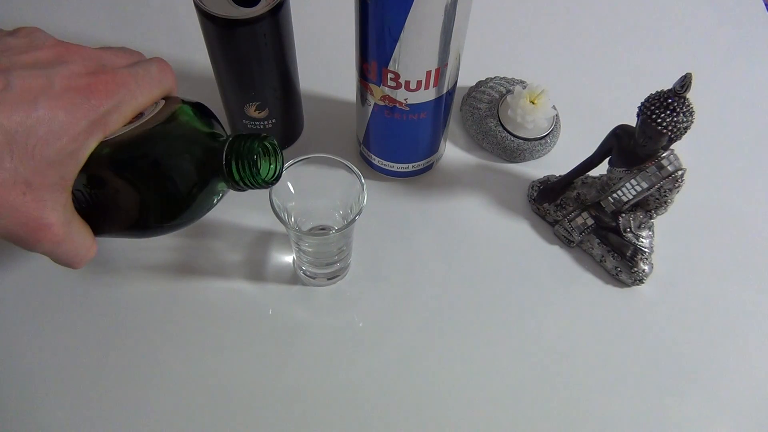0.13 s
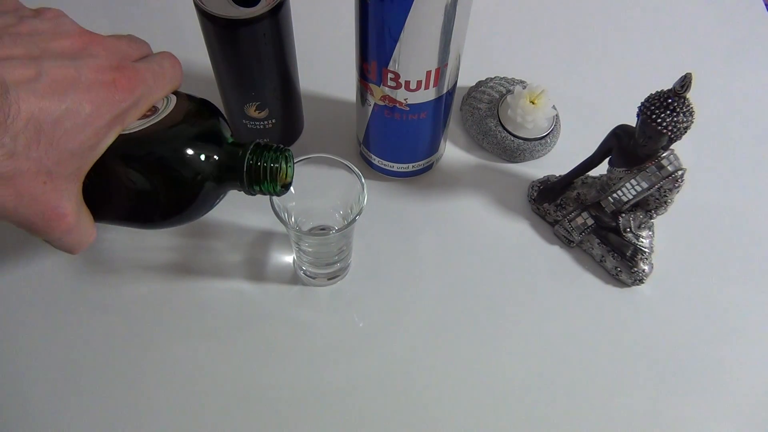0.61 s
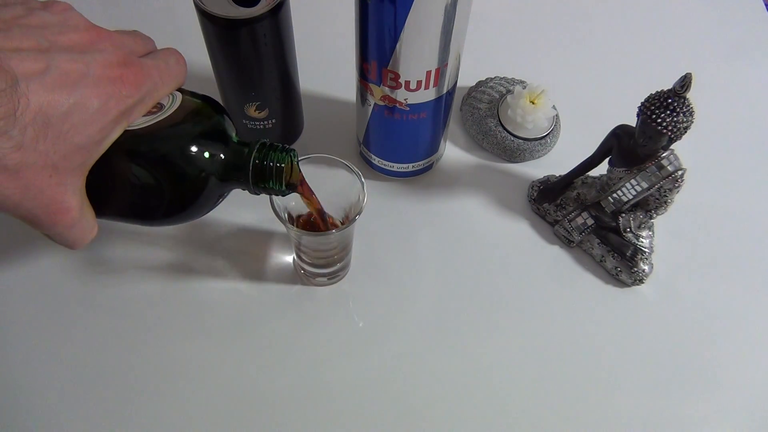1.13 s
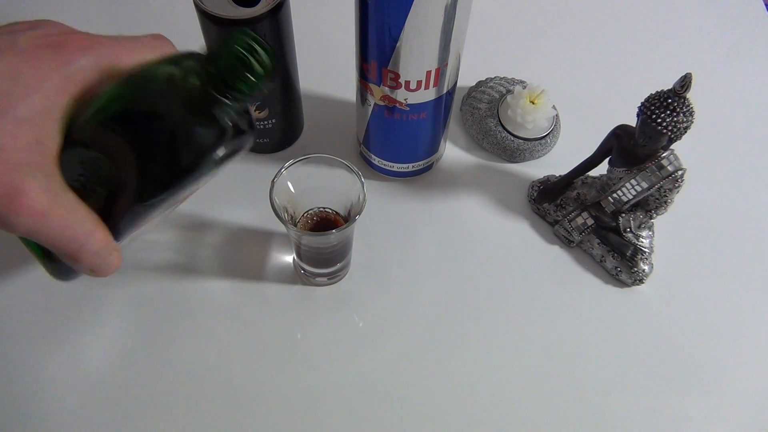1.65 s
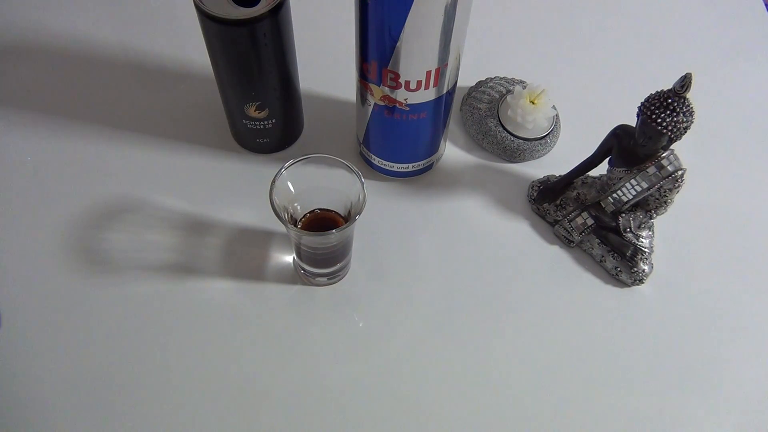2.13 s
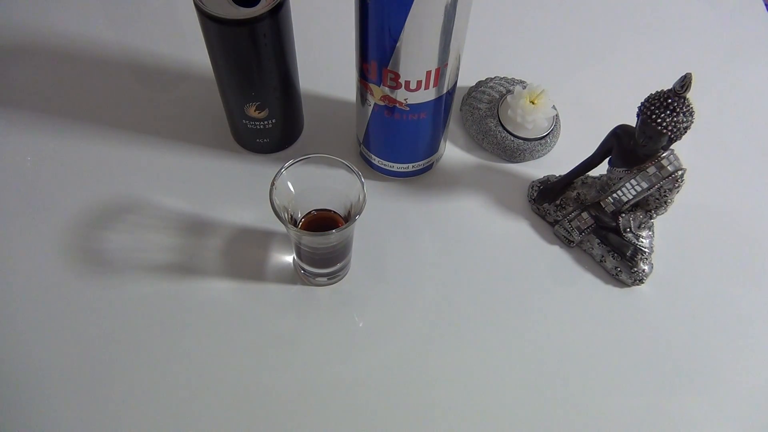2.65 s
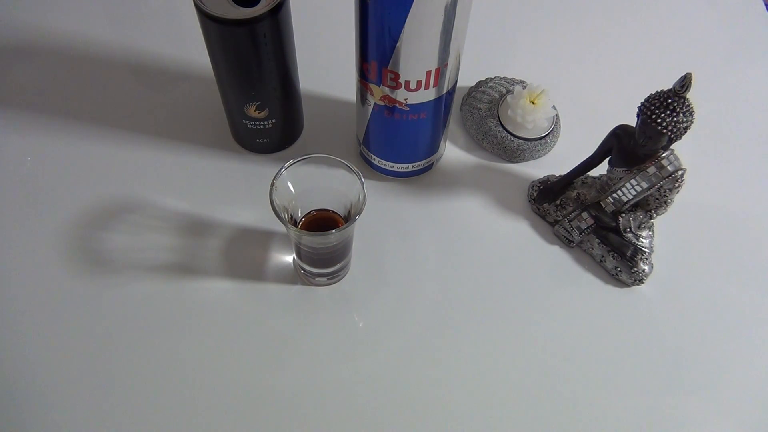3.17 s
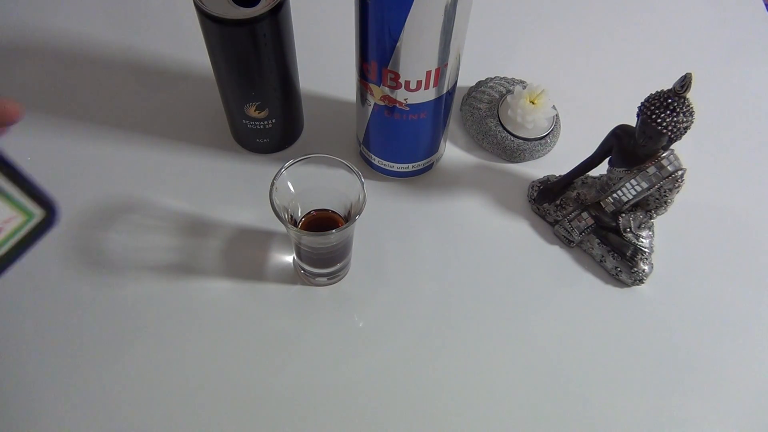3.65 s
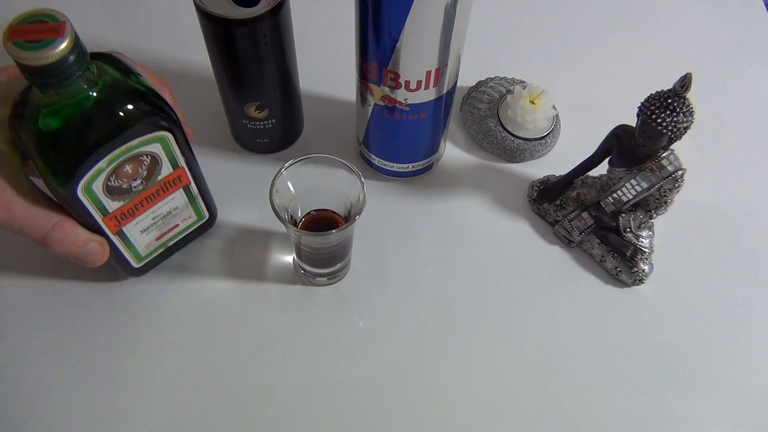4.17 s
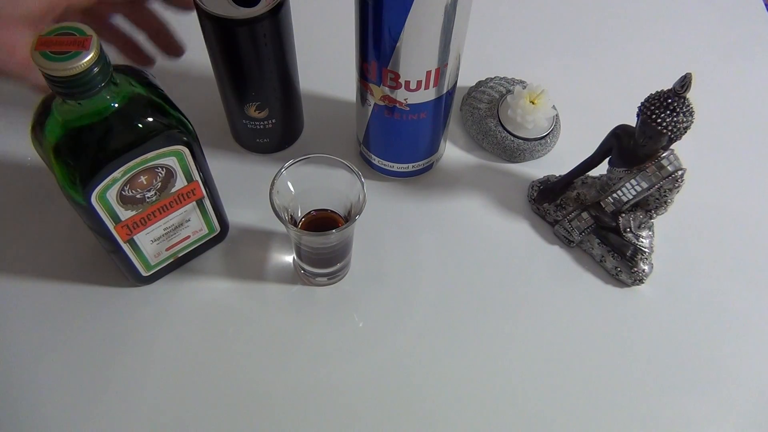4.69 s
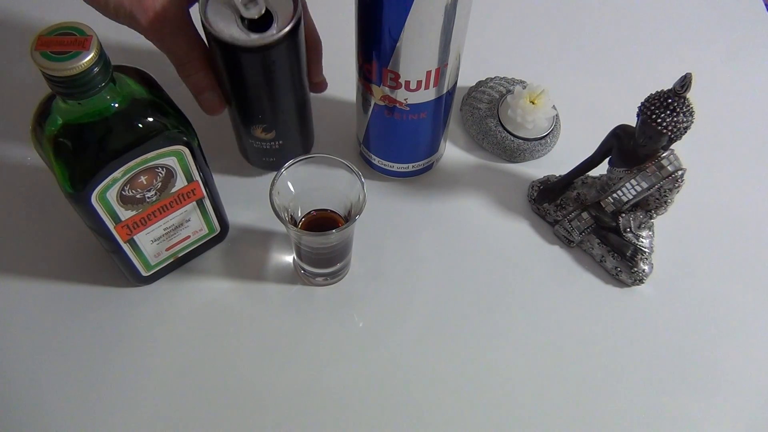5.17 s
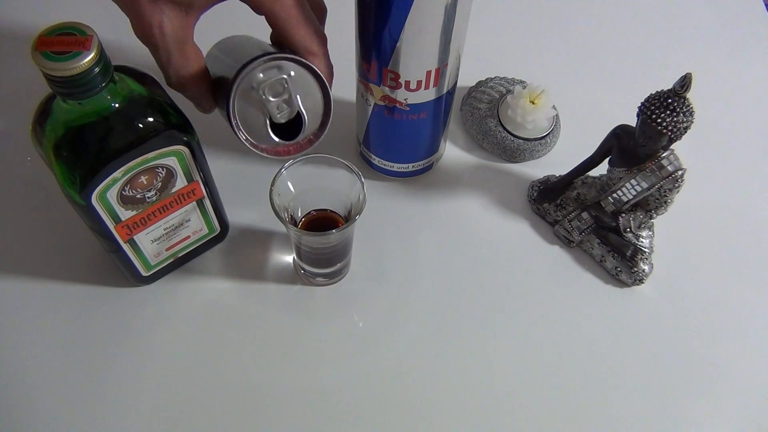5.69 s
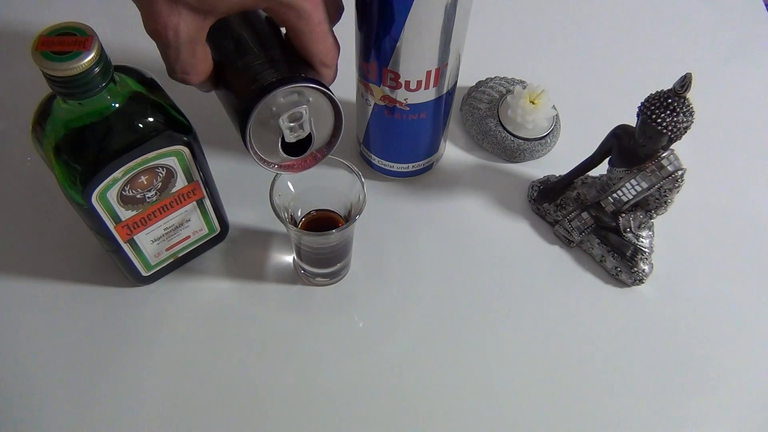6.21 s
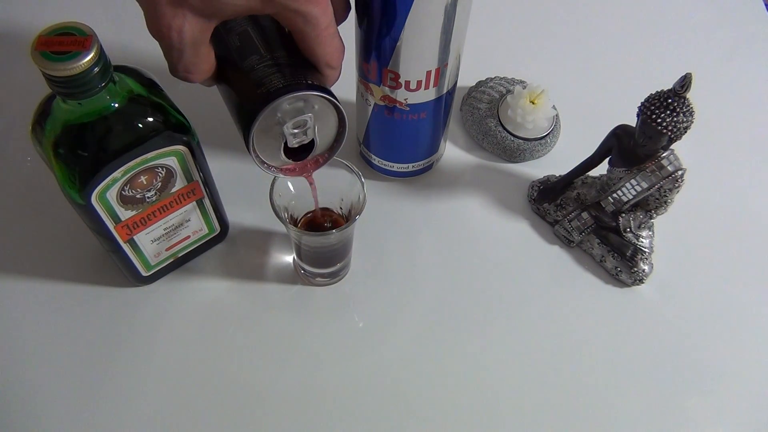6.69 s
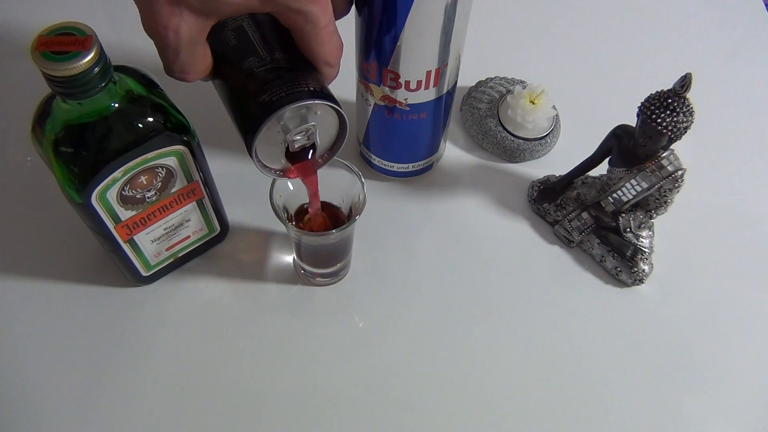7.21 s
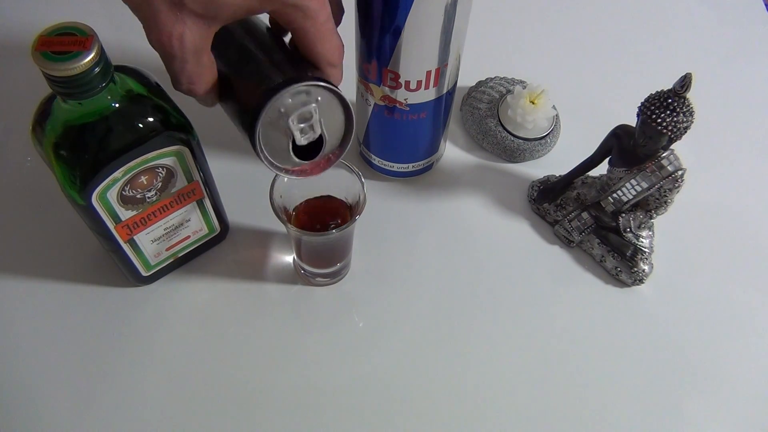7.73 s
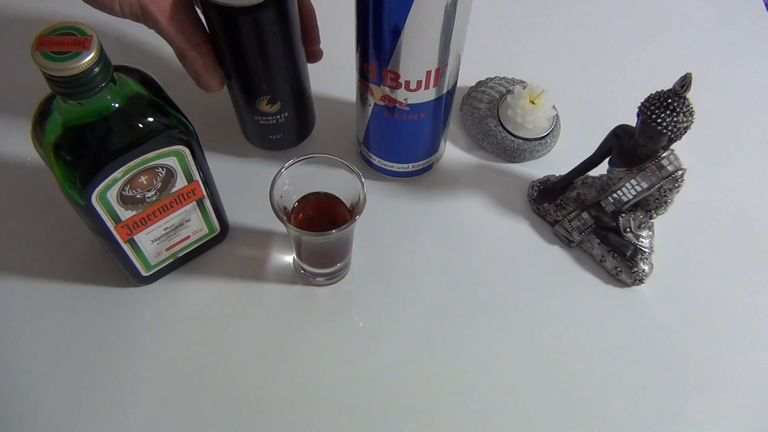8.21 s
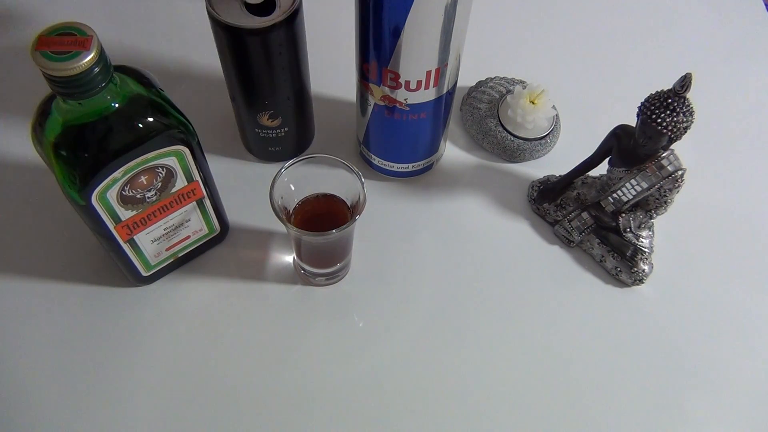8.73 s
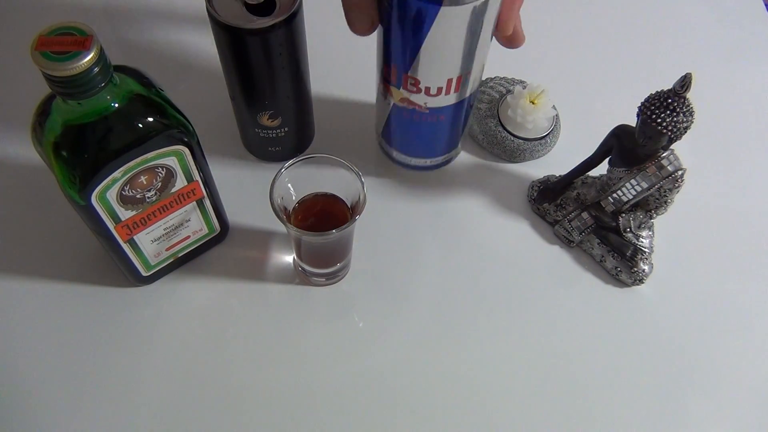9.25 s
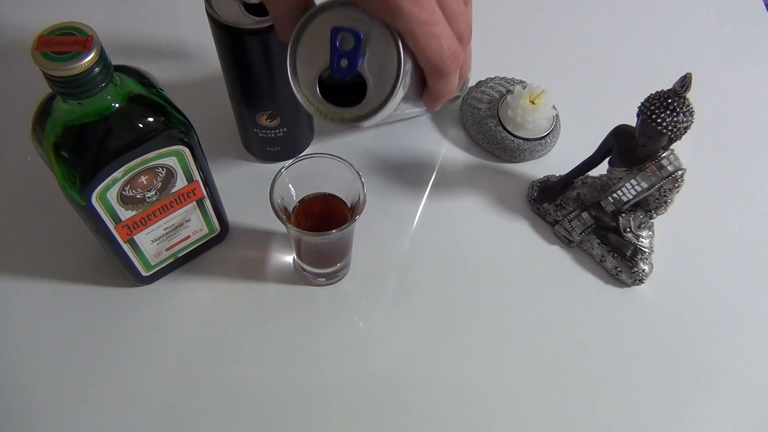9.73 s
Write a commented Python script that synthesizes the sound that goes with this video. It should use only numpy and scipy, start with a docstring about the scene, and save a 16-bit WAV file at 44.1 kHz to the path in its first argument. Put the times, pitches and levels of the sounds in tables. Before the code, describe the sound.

A sharp glass clink in a quiet echoing room, a brief pour, a metal cap screwed on, a bottle thud, then a can pours in two small spurts.

```python
"""In a quiet echoing room, close to a stereo microphone with its own hiss, a bottle neck clinks on a shot
glass and liqueur is poured; the metal cap is screwed back on and the bottle is set on a hard table. Then a
can is lifted, poured from in two spurts and set down. A faint thin whistle is heard far off.
Struck things are short blows ringing dying sines, liquid is bubbles and ticks, and rubbing is shaped noise."""
import sys
import numpy as np
from scipy import signal
from scipy.fft import rfft, irfft
from scipy.io import wavfile
from scipy.ndimage import uniform_filter1d

SR = 44100
rng = np.random.default_rng(int(sys.argv[2]) if len(sys.argv) > 2 else 0)


def wav_record(signal):
    """Record a signal, one row per channel, as 16-bit PCM in the file named by sys.argv[1]."""
    frames = np.transpose(np.atleast_2d(signal))
    bounded = np.clip(frames, -1, 1)
    # unit amplitude maps onto the largest positive 16-bit level
    quanta = np.round(bounded * 32767).astype(np.int16)
    wavfile.write(sys.argv[1], SR, quanta)


def gain_from_db(level_db):
    """Convert decibel levels to linear amplitude factors (20 dB per decade)."""
    decades = np.asarray(level_db, float) / 20
    return 10 ** decades


N = 435266


def read(points, hz):
    """Joins (f/Hz, value) points on a log frequency axis."""
    f, value = np.transpose(points)
    return np.interp(np.log(hz + 1), np.log(f + 1), value)


def add(mix, s, sound):
    """Lays a sound into the mix at s seconds."""
    part = mix[..., round(s * SR):][..., :sound.shape[-1]]
    part += sound[..., :part.shape[-1]]


def evened(x):
    """Scales x to rms 1."""
    return x / np.sqrt(np.mean(x ** 2) + 1e-20)


def peaked(x):
    """Scales x to peak 1."""
    return x / (abs(x).max() + 1e-20)


def lean_left(db):
    """Gains of the left and right side, db apart."""
    return gain_from_db(np.array([[0.5], [-0.5]]) * db)


def curve(tables, column, outside):
    """Draws one column of several timed tables along the whole scene."""
    t = np.arange(N) / SR
    out = np.full(N, float(outside))
    for rows in map(np.array, tables):
        inside = (t >= rows[0, 0]) & (t <= rows[-1, 0])
        out[inside] = np.interp(t[inside], rows[:, 0], rows[:, column])
    return out


def ring(modes, seconds):
    """Sums dying sines, one for each (f/Hz, level/dB, t60/s) mode of a ringing body."""
    t = np.arange(round(seconds * SR)) / SR
    return sum(gain_from_db(db - 60 * t / max(t60, .002)) * np.sin(2 * np.pi * hz * t) for hz, db, t60 in modes)


def blip(hz, cycles):
    """A few cycles with a quick rise and a slower fall, moving no net air."""
    cycles = max(cycles, .4)
    u = np.arange(round(4 * cycles * SR / hz) + 4) * hz / SR / cycles
    shape = u * np.exp(-3.1 * u)
    wave = np.sin(2 * np.pi * u * cycles)
    return peaked(shape * (wave - shape @ wave / shape.sum()))


def coloured(x, points):
    """Filters x by a curve of (f/Hz, level/dB) points."""
    gain = gain_from_db(read(points, np.fft.rfftfreq(len(x), 1 / SR)))
    return irfft(rfft(x) * gain, len(x))


def burst(seconds, low_hz, high_hz):
    """A short puff of noise in a band, dying exponentially."""
    t = np.arange(2000) / SR
    band = signal.butter(2, [low_hz, min(high_hz, 16500)], "band", fs=SR)
    puff = rng.standard_normal(2000) * np.exp(-t / max(seconds, 3e-4))
    return peaked(signal.lfilter(*band, puff))


# spectrum of the room tone and hiss: f/Hz, relative level/dB per Hz
HUSH_SPECTRUM = [(12, -78), (20, -32.5), (108, -12), (217, -7), (331, -5), (534, -5), (687, -7.5),
                 (885, 0.5), (963, -9.5), (1270, -8), (2720, -14.5), (3700, -15), (13900, -16.5),
                 (15100, -14), (16400, -35)]
# how alike the hush is on both sides: f/Hz, likeness (1 = the same)
HUSH_LIKENESS = [(60, 0.29), (240, 0.8), (950, 0.52), (3770, 0.31), (15000, 0.76)]
# thin steady tone: f/Hz, peak level/dB
WHINE_TONE = (19000, -82.5)


def hush():
    """Room tone and microphone hiss as noise partly shared by both sides, with a thin steady sine."""
    frames, hz = N // 512 + 5, np.fft.rfftfreq(2048, 1 / SR)
    a, b, c, d = rng.standard_normal((frames, 1025, 4)).T
    same = np.clip(read(HUSH_LIKENESS, hz), -1, 1)[:, None]
    left = a + 1j * b
    right = same * left + np.sqrt(1 - same ** 2) * (c + 1j * d)
    bins = np.array([left, right]) * gain_from_db(read(HUSH_SPECTRUM, hz))[:, None]
    noise = evened(signal.istft(bins, nperseg=2048, noverlap=1536)[1][:, :N])
    whine_hz, whine_db = WHINE_TONE
    whine = gain_from_db(whine_db) * np.sin(2 * np.pi * whine_hz * np.arange(N) / SR)
    return gain_from_db(-67.14) * noise + whine


# faint thin whistle far off: t/s, f/Hz, rms level/dB
WHISTLE_PATH = [(5.47, 5110, -88), (5.51, 4900, -85), (5.545, 4650, -78), (5.58, 4920, -80),
                (5.61, 5120, -84), (5.63, 5100, -105)]


def whistle():
    """A sine whose pitch and level waver."""
    level = gain_from_db(curve([WHISTLE_PATH], column=2, outside=-140))
    hz = curve([WHISTLE_PATH], column=1, outside=5000)
    return np.sqrt(2) * level * np.sin(2 * np.pi * np.cumsum(hz) / SR)


# how long the room's echo takes to die: f/Hz, t60/s
ROOM_DECAY = [(100, .9), (260, 0.61), (700, 0.68), (1840, 0.7), (4850, 0.2), (12000, 0.18)]
# echo filter, against the sound sent into the room: f/Hz, level/dB
ROOM_COLOUR = [(100, -22.5), (600, -10), (3000, -12), (12000, -6.5)]


def room(x):
    """Sparse reflections of random sign, mostly alike left and right, each band dying at its own speed."""
    taps = np.zeros((3, SR))
    # one reflection at a chance place in every 20 samples
    at = np.arange(300, SR - 20, 20) + rng.integers(0, 20, (3, (SR - 301) // 20))
    np.put_along_axis(taps, at, rng.choice([-1., 1.], at.shape), 1)
    hz, t, bins = signal.stft(taps[0] + 0.39 * taps[1:], SR, nperseg=512)
    tail = signal.istft(bins * gain_from_db(-60 * t / read(ROOM_DECAY, hz)[:, None]), SR, nperseg=512)[1]
    tail = np.array([coloured(side, ROOM_COLOUR) for side in tail / np.linalg.norm(tail[0])])
    return signal.fftconvolve(x[None], tail, axes=1)[:, :N]


# fingers and cap brushing: t/s near the middle, level/dB, f/Hz within the band, nominal length/s
BRUSH_STROKES = [(2.309, -58, 12440, 0.025), (2.576, -60, 6370, .025), (2.922, -52.5, 8900, .025),
                 (2.99, -55.5, 7940, 0.025), (5.06, -60.5, 9650, 0.064), (5.963, -57.5, 6200, .045),
                 (8.539, -58.5, 11000, 0.038), (8.577, -57.5, 9000, 0.032), (8.629, -52.5, 10600, .04),
                 (9.19, -62.5, 4400, 0.042)]


def brushes():
    """Soft swells of wide noise."""
    out = np.zeros(N)
    for s, db, hz, length in BRUSH_STROKES:
        band = signal.butter(2, [hz / 2.0, min(hz * 1.6, 16500)], "band", fs=SR)
        swell = np.hanning(round(0.91 * length * SR))
        noise = signal.lfilter(*band, rng.standard_normal(6000))[:len(swell)]
        add(out, s - 0.52 * length, gain_from_db(db) * swell * evened(noise))
    return out


def rocks():
    """The bottle rocks on its base after landing, settling, every third rock a little harder: (t/s, level/dB)."""
    count, every_s, settle_s = 24, 0.1472, 0.63
    first_db, settled_db = -52, -65.5
    k = np.arange(count)
    late, hard = rng.standard_normal((count, 2)).T
    level_db = settled_db + (first_db - settled_db) * np.exp(-k * every_s / settle_s)
    level_db = level_db + 1.5 * (k % 3 == 0) + 2.5 * hard
    return zip(4.64 + k * every_s + 0.008 * late, level_db)


# blows on the table top, levels before mixing: t/s, push level/dB, push f/Hz, push cycles, crack level/dB
TABLE_BLOWS = [(0.622, -18.5, 737, 2.47, -10.5), (0.638, -50, 700, 2.4, -18), (0.928, -36, 706, 0.88, -38),
               (1.294, -47.5, 848, 2.6, -63), (2.355, -57, 280, 1.4, -50.5),
               (4.341, -18.5, 563, 0.66, -22.5), (4.471, -31, 278.3, 0.54, -30),
               (5.094, -47.5, 423, 1.24, -50.5), (8.414, -22, 606, 2.3, -15.5), (8.439, -29, 700, 2.3, -46),
               (8.579, -40, 640, 0.77, -37.5), (9.832, -35, 312, 3.6, -26.5), (9.861, -48, 283, 1.3, -32)]
# single soft low bumps carried through the table: t/s, push level/dB before mixing
TABLE_BUMPS = [(2.736, -58), (3.319, -62.5), (9.099, -59.5), (9.190, -63), (9.280, -69), (9.695, -70)]
# clear modes of the table top: f/Hz, relative level/dB, t60/s
TABLE_MODES = [(130, -14, 0.2), (205.6, -3.5, 0.31), (284.6, -2, 0.41), (421, -20.5, 0.37),
               (523, -12, 0.1496), (572, -4, 0.11), (632, 9.5, 0.1), (672.6, 1.5, 0.33), (721, 3.5, 0.149),
               (796, 9.5, 0.083), (982, -3, 0.25), (1077, -4.5, 0.064), (1070, -11.5, 0.12)]
# dense crowd of table modes: f/Hz, relative level/dB per Hz
TABLE_CROWD = [(150, -2), (300, -1.5), (1500, -1), (3000, -4), (8000, -9)]


def table_top():
    """Each push is heard directly and, like its crack, rings a few clear modes over a dense crowd of others."""
    push, crack = np.zeros(N), np.zeros(N)
    for s, db, hz, cycles, crack_db in TABLE_BLOWS:
        add(push, s, gain_from_db(db) * blip(hz, cycles))
        add(crack, s, gain_from_db(crack_db) * blip(973, 1.77))
        add(crack, s, gain_from_db(crack_db - 8.0) * burst(0.0019, 1000, 4500))
    for s, db in [*TABLE_BUMPS, *rocks()]:
        add(push, s, gain_from_db(db) * blip(210, 0.8))
    crack = signal.lfilter(*signal.butter(1, 240, "high", fs=SR), crack)
    t = np.arange(SR // 2) / SR
    crowd = gain_from_db(-31 - 60 * t / 0.355) * evened(coloured(rng.standard_normal(len(t)), TABLE_CROWD))
    modes = gain_from_db(-43.5) * signal.oaconvolve(push + 0.45 * crack, ring(TABLE_MODES, 1.6))[:N]
    dense = signal.oaconvolve(push + 0.69 * crack, crowd)[:N]
    return 0.18 * push + crack + modes + dense


def click(hz, shell, rattle_db, left_db):
    """A tick, a short rattle and the ring of thin metal, louder on the left."""
    out = np.array(shell)
    add(out, 0, blip(hz, 2.83))
    add(out, 0, gain_from_db(rattle_db) * burst(0.0027, 780, 13000))
    return out * lean_left(left_db)


# can wall clicking under the fingers and on the table: t/s, level/dB, tick f/Hz
CAN_TICKS = [(5.1, -47, 3300), (5.387, -43.5, 3330), (5.898, -45.5, 5420), (7.981, -38.5, 4370),
             (8.4157, -22, 3140), (8.422, -27.5, 5100)]
# modes of the can wall: f/Hz, relative level/dB, t60/s
CAN_MODES = [(2150, -4, .3), (2918, -3, .25), (5082, -2, .3), (5459, -5, .3), (6438, 3, .08),
             (8236, 2, .07)]


def can():
    """Clicks that ring the can wall."""
    out = np.zeros((2, N))
    wall = gain_from_db(-34) * ring(CAN_MODES, .4)
    for s, db, hz in CAN_TICKS:
        add(out, s, gain_from_db(db) * click(hz, wall, rattle_db=-1, left_db=3.0))
    return out


# thin metal cap clicking: t/s, level/dB, tick f/Hz, ring level/dB and rattle level/dB against the tick
CAP_TICKS = [(1.924, -41.5, 5980, -37, 3), (2.1188, -13.5, 2780, -69, -10.5),
             (2.1206, -16.5, 3600, -40.5, -16), (2.3148, -30.5, 2660, -36, -7),
             (2.3231, -28, 8900, -26, -4.5), (2.3568, -30.5, 12540, -21, -2.5), (2.372, -42, 4900, -26, 13),
             (2.6875, -43, 8500, -36, -3.5), (2.741, -27.5, 4400, -22, 7.5), (3.146, -24, 3920, -15, 4.5),
             (3.3204, -27, 6700, -17, 4.5), (3.401, -39, 11770, -34, -6.5), (3.4118, -40, 13630, -28, -10)]
# modes of the cap: f/Hz
CAP_MODE_HZ = [1826, 2646, 3665, 4790, 5375, 6046, 6570, 6940, 7340, 8870, 13200]
# for each of those modes: relative level/dB, t60/s
CAP_MODES = [(-5, 0.16), (3.5, 0.0468), (0, 0.16), (-5, .09), (-6, 0.18), (-11, 0.072), (1.5, 0.097),
             (-0.5, 0.068), (-22.5, 0.089), (16, .03), (-15, 0.02)]
# cap sliding on, then turning on the thread, a list a stroke: t/s, scrape level/dB before the lean to the left
CAP_STROKES = [
    [(2.125, -52.5), (2.22, -62.5), (2.3, -52), (2.33, -57), (2.36, -64)],
    [(2.68, -64), (2.76, -56), (2.86, -62), (3.0, -54.5), (3.16, -48), (3.3, -68), (3.325, -50.5),
     (3.55, -74)],
]
# one spectrum a stroke: f/Hz, relative level/dB per Hz
SCRAPE_SPECTRA = [
    [(500, -23), (2150, -26), (2550, 1.5), (4700, -3), (5400, -15), (7600, -27), (8400, -6.5), (9300, -35),
     (11500, -18), (15500, -24.5)],
    [(300, -15), (1780, -4), (3750, -2), (5400, -6), (11900, -10.5), (15500, -23.5)],
]


def cap():
    """Clicks and a grainy scrape ring the thin metal; the thread catches again and again."""
    out = np.zeros((2, N))
    # each struck spot favours other modes, with a spread of 3.5 dB
    spots = 3.5 * rng.standard_normal((len(CAP_TICKS), len(CAP_MODES)))
    for (s, db, hz, ring_db, rattle_db), spot in zip(CAP_TICKS, spots):
        modes = [(f, ring_db + mode_db + spot_db, t60)
                 for f, (mode_db, t60), spot_db in zip(CAP_MODE_HZ, CAP_MODES, spot)]
        add(out, s, gain_from_db(db) * click(hz, ring(modes, .25), rattle_db, left_db=6))
    roughness = evened(uniform_filter1d(rng.standard_normal(N), 130))
    grains = rng.standard_normal(N) * gain_from_db(3.4 * roughness)
    slide, thread = (evened(coloured(grains, points)) for points in SCRAPE_SPECTRA)
    shell = ring([(hz, *mode) for hz, mode in zip(CAP_MODE_HZ, CAP_MODES)], .25)
    thread = evened(thread + .45 * evened(signal.oaconvolve(grains, shell)[:N]))
    catch_s, catch_every_s = 2.915, 0.082
    catch_db = np.cos(2 * np.pi * (np.arange(N) / SR - catch_s) / catch_every_s)
    thread = thread * gain_from_db(catch_db)
    scrape = sum(gain_from_db(curve([rows], column=1, outside=-140)) * rub
                 for rows, rub in zip(CAP_STROKES, (slide, thread)))
    return out + scrape * lean_left(5.6)


# blows on the rim of the shot glass: t/s, level/dB
RIM_BLOWS = [(0.625, -31), (0.635, -38), (5.962, -49), (6.698, -63)]
# modes of the shot glass: f/Hz, relative level/dB, t60/s
GLASS_MODES = [(5733, -9, .2), (10040, 0, .2), (14040, -22, .2)]
# blows on the bottle neck: t/s, level/dB
NECK_BLOWS = [(.6215, -11.5), (.638, -23.5), (.929, -50.5)]
# modes of the bottle: f/Hz
BOTTLE_MODE_HZ = [1590, 2577, 2595, 3586, 3624, 3648, 4184, 4274, 5582, 6406, 6756, 6998, 7467, 7817, 8328,
                  8786]
# for each of those modes: relative level/dB, t60/s
BOTTLE_MODES = [(-8.5, 0.11), (-3.5, .2), (-11.5, 0.44), (-9, 0.26), (-2, 0.27), (-12.5, 0.37),
                (-16.5, .25), (-9.5, .36), (-15.5, .1), (-22.5, .12), (-5, 0.1657), (-16.5, .35),
                (-13.5, 0.14), (-29.5, 0.37), (-12, 0.21), (-33, 0.39)]
# air in the bottle, humming after it lands: f/Hz, level/dB, t60/s
BOTTLE_HUM = (347, -54, 1.7)


def glass():
    """Rim and neck ring where they are struck; the air in the bottle hums after it lands."""
    out = np.zeros(N)
    rim = peaked(ring(GLASS_MODES, .5))
    for s, db in RIM_BLOWS:
        add(out, s, gain_from_db(db) * rim)
    neck = peaked(ring([(hz, *mode) for hz, mode in zip(BOTTLE_MODE_HZ, BOTTLE_MODES)], 0.93))
    for s, db in NECK_BLOWS:
        add(out, s, gain_from_db(db) * neck)
    add(out, 4.49, ring([BOTTLE_HUM], 1.2))
    return out


def bubble(hz, t60, rise):
    """A dying sine that climbs, by the share rise a second, as the bubble nears the surface."""
    t = np.arange(round(1.2 * max(t60, .003) * SR)) / SR
    shape = gain_from_db(-60 * t / max(t60, .003)) * (1 - np.exp(-t * hz / 0.37))
    return peaked(shape * np.sin(2 * np.pi * hz * (t + rise * t ** 2 / 2)))


# air gulped through the can mouth: t/s, level/dB, first f/Hz
CAN_GULPS = [(5.897, -55.5, 546), (5.965, -46.5, 586), (6.147, -40.5, 770), (6.268, -39, 630),
             (6.366, -51.5, 670), (6.587, -29, 803), (6.609, -40, 835), (6.827, -45.5, 600),
             (7.301, -47, 494), (7.370, -55, 553), (7.430, -53, 640), (7.484, -39, 740),
             (7.585, -42.5, 586), (7.617, -43.5, 615)]
# air inside the can: f/Hz, level/dB, t60/s
CAN_AIR_MODE = [(427, -45.5, 0.37)]


def glugs():
    """Gulps of air, each dying by 60 dB in 23 cycles, ring the air inside the can."""
    out = np.zeros(N)
    for s, db, hz in CAN_GULPS:
        add(out, s, gain_from_db(db) * bubble(hz, 23 / hz, 12.1))
    return out + signal.oaconvolve(out, ring(CAN_AIR_MODE, .5))[:N]


def chirp(first_hz, last_hz, length):
    """A short gliding sine: a bubble changing pitch as it pinches off."""
    hz = np.geomspace(first_hz, last_hz, round(length * SR))
    return signal.windows.tukey(len(hz), .6) * np.sin(2 * np.pi * np.cumsum(hz) / SR)


def pop(hz):
    """A high tick with a puff of spray."""
    out = gain_from_db(-6.5) * burst(0.0011, 3800, 15000)
    add(out, 0, blip(hz, 6.0))
    return out


def chance_hits(spread_db, rate):
    """Single-sample hits at chance moments, rate a second, with chance sizes from 0 dB up."""
    size = gain_from_db(spread_db * np.minimum(rng.exponential(1, N), 3))
    return size * (rng.random(N) < rate / SR)


def scatter(grains, rate):
    """Plays each grain at chance moments and sizes, rate a second in all."""
    return sum(signal.oaconvolve(chance_hits(4.0, rate / len(grains)), grain)[:N] for grain in grains)


# large bubbles under the stream: t/s, level/dB, first f/Hz
LARGE_BUBBLES = [(1.0725, -45, 1500), (1.0949, -30, 1625), (1.1832, -42, 1700), (1.2481, -40, 1640),
                 (1.2565, -35.5, 1655), (1.2979, -41, 1750), (1.3234, -39.5, 1725), (6.5859, -36.5, 1680),
                 (6.5994, -35, 2020), (6.6578, -38.5, 1610), (6.7865, -34.5, 1460), (6.8653, -47.5, 1930),
                 (7.2963, -38, 1980), (7.4839, -34, 1630), (7.521, -46, 1480), (7.4994, -39, 1880),
                 (7.5812, -40, 1940), (7.6096, -37, 2000)]
# clearest bubbles that climb or fall as they pinch off: t/s, level/dB, first f/Hz, last f/Hz, length/s
PINCHED_BUBBLES = [(1.115, -55, 1940, 3700, 0.023), (1.144, -46.5, 2740, 3100, 0.0048),
                   (1.287, -55, 3230, 4400, 0.012), (6.659, -45.5, 1640, 2060, 0.016),
                   (6.785, -51.5, 2870, 3230, 0.0097), (7.288, -52, 4070, 2600, 0.012),
                   (7.428, -56.5, 1520, 2330, 0.015)]
# loud splashes and bursting skins: t/s, level/dB, f/Hz
SPLASHES = [(1.0213, -49, 6630), (1.089, -37.5, 7700), (1.0948, -33, 5860), (1.0979, -29.5, 9700),
            (1.1036, -35, 9950), (1.1196, -37, 8300), (1.1842, -42, 4940), (1.251, -31.5, 11400),
            (1.2787, -38.5, 10500), (1.2854, -32, 10100), (1.3276, -39, 11900), (6.5867, -27.5, 8250),
            (6.5966, -26, 11410), (6.6003, -27, 8400), (6.6056, -24.5, 10600), (6.6299, -32, 8800),
            (6.7609, -40, 12800), (6.8201, -34.5, 11200), (6.8356, -39, 11500), (6.8595, -29, 7490),
            (6.8648, -32, 8600), (7.286, -38, 10850), (7.3225, -37.5, 12450), (7.3645, -34.5, 7500),
            (7.3799, -30, 10400), (7.5585, -36.5, 10200), (7.5783, -33, 8100), (7.6132, -31, 9900),
            (7.6584, -33.5, 11000), (7.6859, -40.5, 10700), (7.7412, -41, 11500), (7.849, -36.5, 9700)]
# stream running into the glass, a list a spurt: t/s, trickle level/dB, air column f/Hz, small pops a second
POUR_STREAM = [
    [(1.03, -77, 1600, 8), (1.08, -56, 1610, 70), (1.2, -56.5, 1720, 80), (1.33, -57, 1870, 50),
     (1.42, -74.5, 1840, 1.5)],
    [(6.58, -71.5, 1910, 50), (6.7, -75, 1680, 30), (6.88, -74, 1580, 30), (7.0, -86.5, 1550, 3)],
    [(7.26, -80, 1950, 80), (7.33, -70.5, 1920, 70), (7.52, -64, 1870, 60), (7.68, -74, 2050, 50),
     (7.92, -102, 1900, 8)],
]


def trickle():
    """Small chance bubbles, heard plainly and through the air column of the glass, with chance chirps."""
    glides = [chirp(hz, hz * climb, .007) for hz in (2300, 2910, 3600, 4400) for climb in (.85, 1.15, 1.35)]
    chirps = 0.72 * evened(scatter(glides, 60))
    small = np.zeros(N)
    for hz in np.geomspace(1300, 12000, 16):
        fall = gain_from_db(-2.5 * np.log2(hz / 1300))
        small += fall * signal.oaconvolve(chance_hits(3.4, 45), bubble(hz, 45 / hz, 31.87))[:N]
    # a resonance 260 Hz wide follows the column: shift it down to 0 Hz, smooth, shift back
    turn = np.exp(2j * np.pi * np.cumsum(curve(POUR_STREAM, column=2, outside=790)) / SR)
    r = np.exp(-np.pi * 260 / SR)
    column = 2 * (turn * signal.lfilter([1 - r], [1, -r], small / turn)).real
    mixed = evened(.75 * evened(small) + evened(column) + chirps)
    return gain_from_db(curve(POUR_STREAM, column=1, outside=-120)) * mixed


def liquid():
    """Single bubbles, chirps and pops stand out over small chance pops and the trickle."""
    out = np.zeros(N)
    for s, db, hz in LARGE_BUBBLES:
        add(out, s, gain_from_db(db) * bubble(hz, 55 / hz, 7.9))
    for s, db, *glide in PINCHED_BUBBLES:
        add(out, s, gain_from_db(db) * chirp(*glide))
    for s, db, hz in SPLASHES:
        add(out, s, gain_from_db(db) * pop(hz))
    rate = curve(POUR_STREAM, column=3, outside=0)
    out += gain_from_db(-54) * scatter([pop(hz) for hz in np.geomspace(3700, 12000, 8)], rate)
    return out + trickle()


def scene():
    """Near sources stand a little left of the microphone, which drops the deep bass of near sounds."""
    pour, metal = liquid(), cap() + can()
    struck = table_top() + glass() + brushes() + glugs()
    near = struck * lean_left(1.2) + pour * lean_left(0.8) + metal
    # the table top mirrors each sound back a moment later, by a different path to each side
    mirror = np.array([np.roll(side, lag) for side, lag in zip(near, (11, 14))])
    # the glass aims the pour up at the microphone, so less of it reaches the walls
    echo = room(struck + gain_from_db(-5.0) * pour + gain_from_db(-3.0) * metal.mean(0))
    bass_cut = signal.butter(3, 110, "high", fs=SR, output="sos")
    heard = signal.sosfilt(bass_cut, near + 0.13 * mirror + echo)
    return heard + whistle() + hush()


def top_cut(x):
    """Nothing passes above the cut-off."""
    return signal.sosfilt(signal.butter(12, 16840, fs=SR, output="sos"), x)


def record(dry):
    """Takes down the finished stereo mix."""
    return top_cut(dry)


dry = scene()
out = record(dry)
wav_record(out)
```